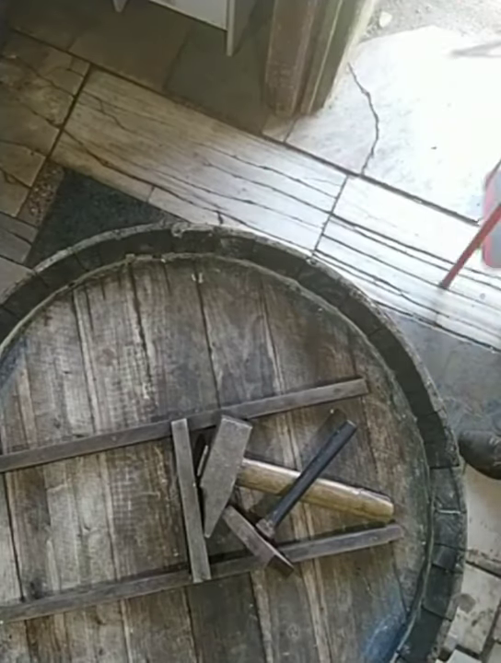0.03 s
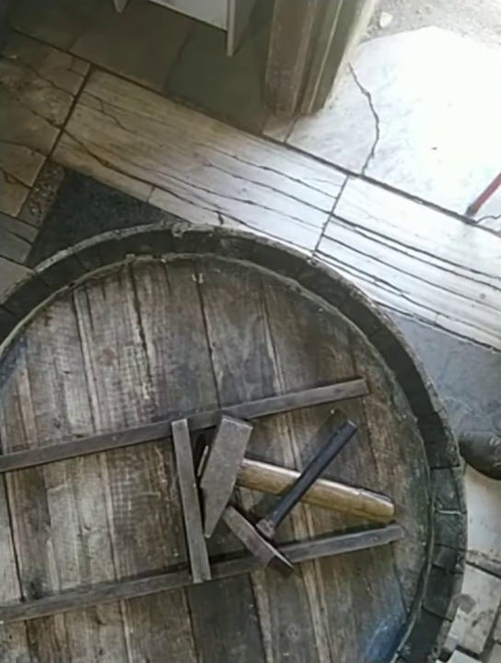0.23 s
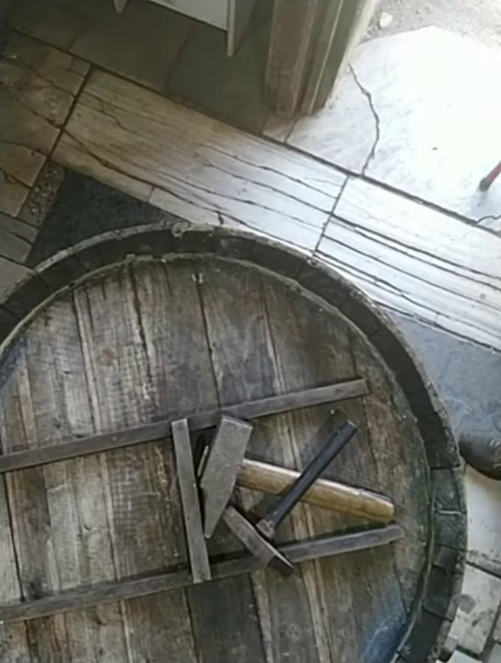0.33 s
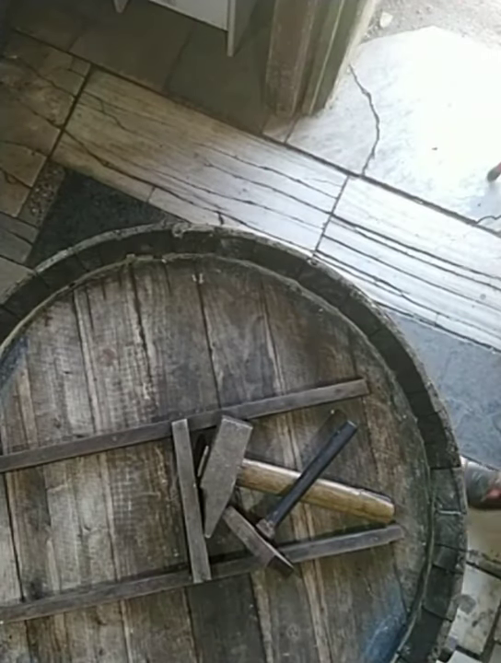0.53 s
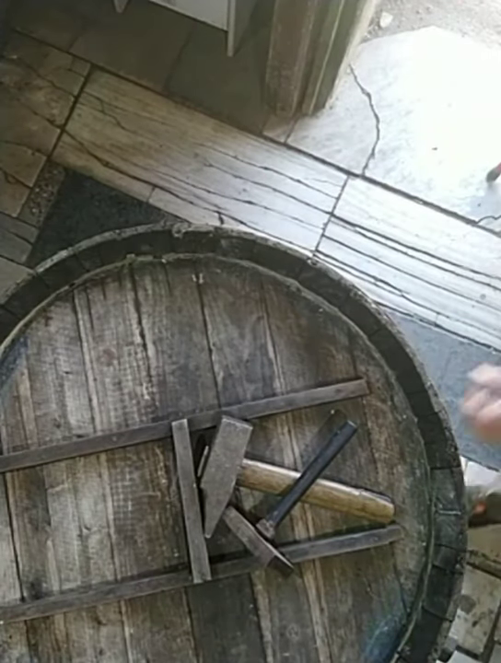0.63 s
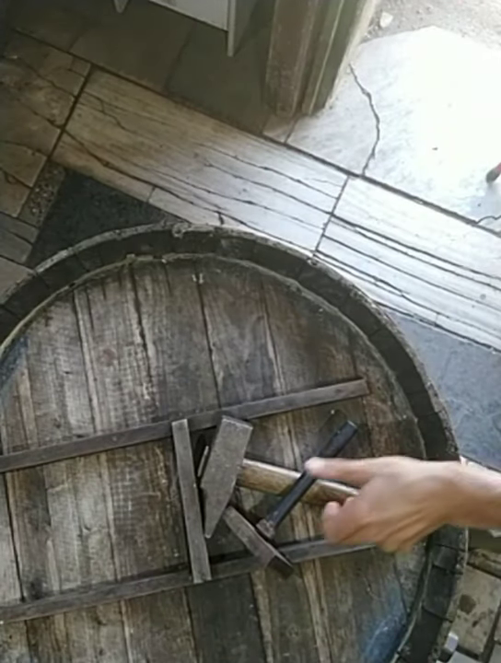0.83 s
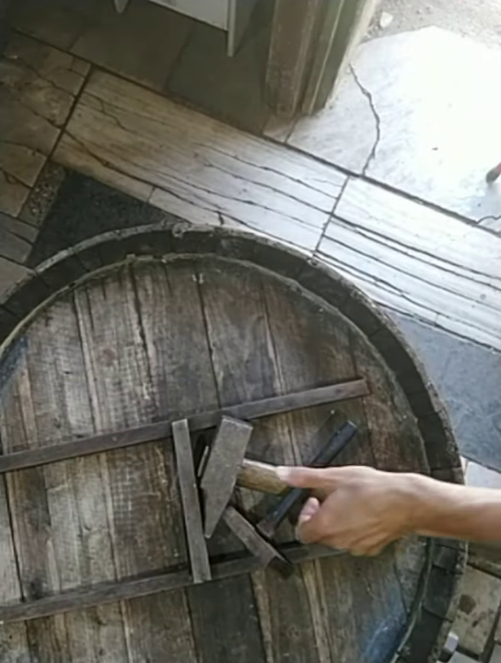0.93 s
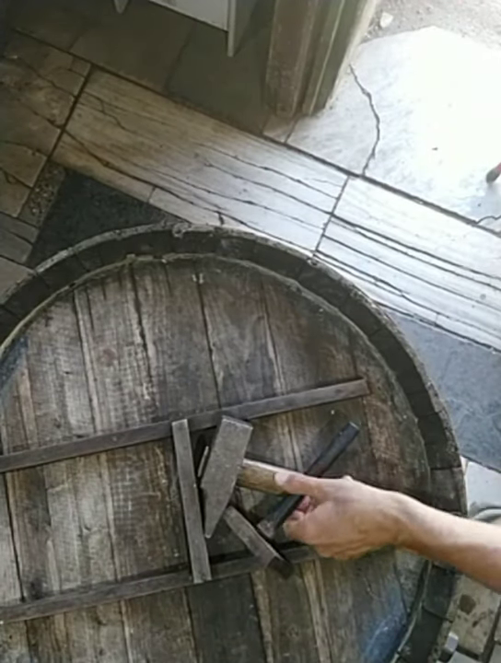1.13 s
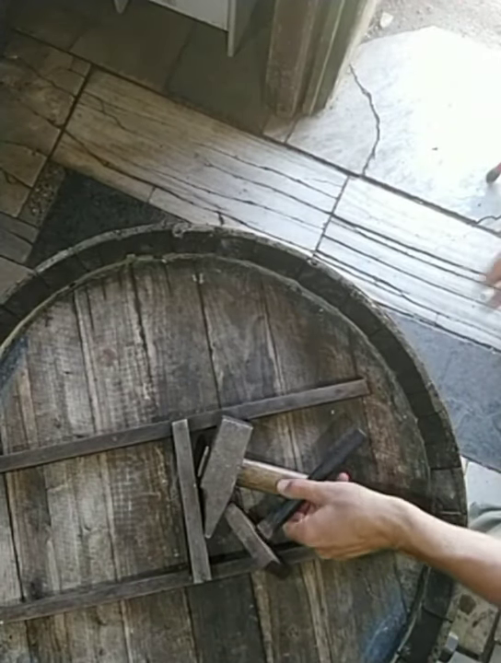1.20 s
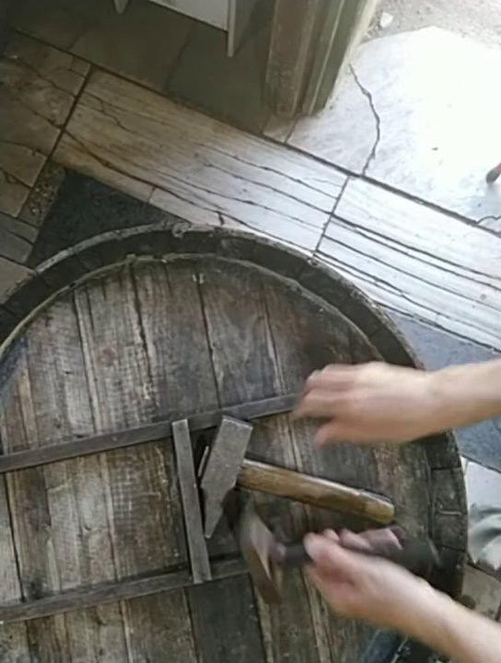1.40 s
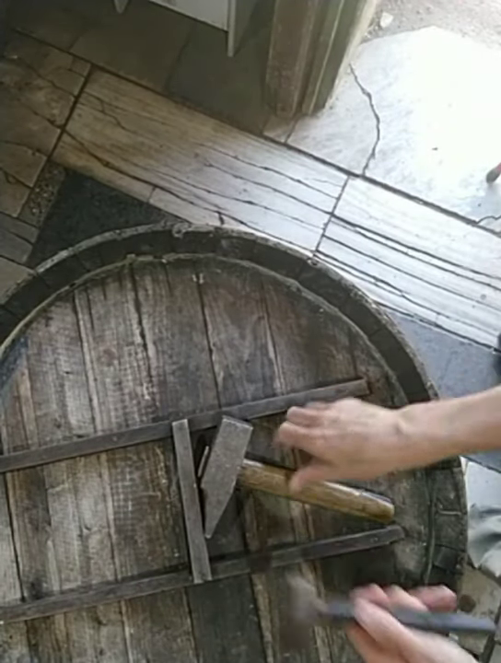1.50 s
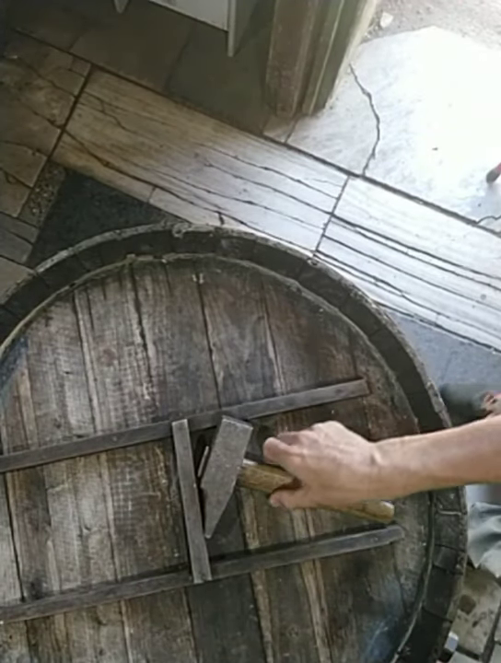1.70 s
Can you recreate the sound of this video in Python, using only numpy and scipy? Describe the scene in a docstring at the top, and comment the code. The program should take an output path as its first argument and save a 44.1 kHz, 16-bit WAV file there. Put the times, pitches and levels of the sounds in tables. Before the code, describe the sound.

Chair legs scrape and judder across stone in a doorway, the metal frame ringing. Next a hammer slides, clinks against other tools and thuds on a hollow barrel lid. Clothes rustle faintly and a distant machine hums outdoors.

```python
"""A metal-framed chair is dragged over stone paving in a doorway: stick-slip friction at its feet
grates, and with the bumps of its legs drives the ringing modes of the frame. Then a hammer is pulled
from among the tools on a wooden barrel: it slides and knocks on the hollow, resonant lid, and steel
clinks on steel. Clothes rustle faintly and a far machine hums in the outdoor air.
Reflections from near walls add a short echo, and two microphones hear the scene from above."""
import sys
import numpy as np
from scipy import signal
from scipy.fft import rfft, irfft
from scipy.io import wavfile

SR = 44100
rng = np.random.default_rng(int(sys.argv[2]) if len(sys.argv) > 2 else 0)


def transcribe(u):
    """Save the signal u as a 16-bit wav file named by the first command-line argument.

    u: samples, shape (n,) or (channels, n), limited to [-1, 1]; the rate is SR.
    q: integer samples, one column per channel.
    """
    v = np.clip(np.atleast_2d(u).T, -1, 1)
    q = np.round(v * 32767).astype(np.int16)
    wavfile.write(sys.argv[1], SR, q)


N = 77175

# partials of the machine hum (frequency [Hz], level [dB])
HUM_PARTIALS = [(70.0, -63.5), (140.0, -57), (209.9, -62), (366.1, -100), (452.2, -70.5)]
# spectrum of the outdoor air (frequency [Hz], relative level [dB])
AIR_SPECTRUM = [(20, -27.5), (55, -0.5), (100, 8.5), (170, -1.5), (280, -10), (480, -5), (900, -10),
                (1600, -16.5), (5000, -25), (15000, -22)]
# envelope of the rustle (time [s], level [dB])
RUSTLE_ENVELOPE = [(0, -65), (.14, -54), (.2, -63.5), (.92, -67), (.99, -61), (1.06, -102), (1.17, -64),
                   (1.24, -51.5), (1.36, -50.5), (1.5, -64), (1.58, -66.5), (1.7, -73)]
# spectrum of rubbing cloth (frequency [Hz], relative level [dB])
CLOTH_SPECTRUM = [(200, -7), (900, 6.5), (2300, 10.5), (3300, 5.5), (5300, 3), (8000, 1), (15000, -6)]
# envelope of the frame's low shudder (time [s], level [dB])
SHUDDER_ENVELOPE = [(.19, -68), (.22, -52), (.4, -48), (.56, -52), (.62, -39), (.7, -50), (.79, -44),
                    (.88, -69)]
# friction at the chair feet (time [s], level [dB], treble gain [dB])
DRAG_ENVELOPE = [(.194, -81, 9), (.2, -23, 2), (.216, -21, -12), (.235, -26.5, -3), (.254, -21.5, 2.5),
                 (.298, -41.5, 6), (.32, -23.5, -1.5), (.402, -41, -5), (.438, -27.5, -1), (.478, -44.5, 2),
                 (.53, -34, 4), (.572, -25, -8.5), (.602, -17.5, 5.5), (.648, -29, 2.5), (.715, -56, -13),
                 (.755, -51.5, 10.5), (.815, -42.5, -2), (.86, -76, -33)]
# bumps of the chair legs (time [s], level [dB], contact time [ms])
LEG_BUMPS = [(.2415, 12, 0.64), (.25, 15, 0.42), (.261, 16, 0.44), (.4855, 0.5, 0.11), (.512, 13, 0.4),
             (.788, 6.5, 0.57), (.797, 4.5, 0.99), (.812, 0.5, 0.8), (.822, -7, 1)]
# spectrum of a foot grating on stone (frequency [Hz], relative level [dB])
GRATE_SPECTRUM = [(30, -15.5), (70, -33), (105, -30), (150, 0), (280, -12), (420, -3), (800, -3.5),
                  (1400, -4), (2400, 0.5), (3100, -3.5), (5500, -5.5), (9000, -9.5), (15500, -11.5)]
# modes of the chair frame (frequency [Hz], relative level [dB], T60 [s])
FRAME_MODES = [(212.4, -13, 0.29), (401.6, -12, 0.26), (464.8, -16.5, .25), (499.7, -12.5, 0.23),
               (805, -18, 0.14), (969, -26.5, 0.27), (1360, -16.5, 0.067), (1461, -19.5, 0.14),
               (1837, -18.5, .16), (2155, -8.5, 0.19), (2325, -18.5, 0.27), (3620, -14, 0.075)]
# friction as a hand touches the tools, then the hammer slides (time [s], level [dB])
SLIDE_ENVELOPE = [(.94, -58), (.99, -50), (1.06, -68), (1.2, -62), (1.265, -51), (1.296, -34.5),
                  (1.34, -32.5), (1.36, -37.5), (1.378, -46.5), (1.435, -40), (1.48, -59.5)]
# knocks on the lid (time [s], level [dB], contact time [ms])
LID_KNOCKS = [(.981, -17.5, 2), (.997, -15, 1.2), (1.2695, 1.5, 2.42), (1.277, -8.5, 0.22),
              (1.309, -9, 2.1), (1.356, -3, 0.51), (1.364, -11, .7), (1.387, 14, 1.97), (1.417, -1, 2.3),
              (1.576, -8.5, 2)]
# spectrum of the wood's dull thud (frequency [Hz], relative level [dB])
THUD_SPECTRUM = [(40, -40), (130, 0), (230, 5.5), (380, 0), (700, -6.5), (1500, -10), (2500, -3.5),
                 (5000, -22.5), (15000, -36)]
# modes of the barrel lid (frequency [Hz], relative level [dB], T60 [s])
LID_MODES = [(195, -1, 0.45), (231, -10.5, .14), (281.6, -9.5, 0.61), (366, -6.5, 0.5), (551, -5, 0.14),
             (607, -10.5, 0.28), (737, -16.5, 0.19), (1000, -9.5, 0.074), (1100, -22, 0.14)]
# contacts of steel on steel (time [s], level [dB])
STEEL_CLINKS = [(1.2699, -10.5), (1.277, -16), (1.364, -18), (1.387, -10.5)]
# modes of the hammer head (frequency [Hz], relative level [dB], T60 [s])
STEEL_MODES = [(1582, -5, 0.034), (2449, -3, 0.13), (3330, -4, 0.05), (5220, -2.5, 0.041)]
# response of the left microphone (frequency [Hz], gain [dB])
LEFT_RESPONSE = [(500, 1), (2400, -5.5), (4100, -3.5), (5500, -5.5), (7000, -2), (7650, -7), (8000, -13.5),
                 (8700, -3.5), (15500, -15)]
# response of the right microphone (frequency [Hz], gain [dB])
RIGHT_RESPONSE = [(500, 0), (2400, -1), (4000, 1.5), (5400, 7), (6500, -3.5), (7300, -13), (8000, -49),
                  (8800, -13), (11700, -21.5), (15000, -12.5)]

SLIPS_PER_S, JUDDER_HZ = 1800, 129.75
ROOM_LOW_T60_S, ROOM_HIGH_T60_S, ROOM_ONSET_S, COHERENT_BELOW_HZ = 0.37, 0.24, 0.003, 706
MIC_SPACING_M, SOUND_SPEED_M_S = 0.1, 343
CHAIR_LAG_MS, LID_LAG_MS = 0.068, -0.16  # right microphone behind the left
TIME = np.arange(N) / SR


def undb(db):
    """Amplitude grows tenfold for every 20 dB."""
    return 10 ** (np.asarray(db) / 20)


def unit(x):
    """Normalisation to rms 1."""
    return x / np.sqrt(np.mean(x ** 2))


def envelope(rows, column=1):
    """Gain at every sample, by linear interpolation in decibels."""
    rows = np.array(rows)
    return undb(np.interp(TIME, rows[:, 0], rows[:, column]))


def drift(hz):
    """Slow random modulation: interpolation between Gaussian values."""
    points = rng.standard_normal(4096)
    return np.interp(TIME * hz, np.arange(len(points)), points)


def decay(t, t60):
    """Exponential damping: 60 dB are lost in t60 seconds."""
    return np.exp(-np.log(1000) * t / t60)


def through(x, response):
    """A linear system convolves its input with its impulse response."""
    return signal.fftconvolve(np.atleast_2d(x), np.atleast_2d(response), axes=-1)[:, :N]


def butter(x, kind, hz, order=2):
    """A maximally flat filter falls 6 dB per octave and order beyond its cutoff."""
    return signal.sosfilt(signal.butter(order, hz, kind, fs=SR, output="sos"), x)


def minimum_phase(spectrum, size=4096):
    """Folding the cepstrum gives a causal response with the given spectrum."""
    hz, db = np.array(spectrum).T
    bins_hz = np.maximum(np.fft.rfftfreq(size, 1 / SR), 1)
    magnitude = undb(np.interp(np.log(bins_hz), np.log(hz), db))
    cepstrum = irfft(np.log(magnitude))
    cepstrum[1:size // 2] *= 2
    cepstrum[size // 2 + 1:] = 0
    return np.pad(irfft(np.exp(rfft(cepstrum))), (0, N - size))


def body(spectrum):
    """Heavy damping gives a broad, brief response, here of energy 1."""
    return unit(minimum_phase(spectrum)) / np.sqrt(N)


def machine_hum():
    """A far machine's partials waver by slight amplitude and phase modulation."""
    return sum(np.sqrt(2) * undb(db + 2 * drift(6)) * np.sin(2 * np.pi * hz * TIME + 0.56 * drift(4.8))
               for hz, db in HUM_PARTIALS)


def diffuse_noise():
    """In a diffuse field, long waves are coherent at two nearby points."""
    mid, side = rfft(rng.standard_normal((2, N)))
    coherence = 1 / (1 + (np.fft.rfftfreq(N, 1 / SR) / COHERENT_BELOW_HZ) ** 2)
    pair = mid * np.sqrt(1 + coherence) + np.array([[1], [-1]]) * side * np.sqrt(1 - coherence)
    return irfft(pair, N) / np.sqrt(2)


def outdoor_air(level_db=-52):
    """Ambient noise is a diffuse field; its level drifts by about a decibel."""
    return through(diffuse_noise(), body(AIR_SPECTRUM)) * undb(level_db - drift(1.9))


def slips(per_s, scatter_db=4.5, judder_db=4.5):
    """Stick-slip friction: tiny random jerks whose strength swells and sinks."""
    jerks = (rng.random(N) < per_s / SR) * rng.choice([-1, 1], N)
    size_db = scatter_db * np.clip(rng.standard_normal(N), -2, 2) + judder_db * drift(JUDDER_HZ)
    return unit(jerks * undb(size_db))


def doorway(x, room_db, lag_ms):
    """Wall reflections follow the direct sound as reverberation whose treble dies first."""
    noise = diffuse_noise()
    low = butter(noise, "low", 900) * decay(TIME, ROOM_LOW_T60_S)
    high = butter(noise, "high", 1160) * decay(TIME, ROOM_HIGH_T60_S)
    onset = np.clip(TIME / ROOM_ONSET_S - .5, 0, 1)
    tail = unit((low - high) * onset) / np.sqrt(N)
    delay_samples = 16 + np.array([[-.5], [.5]]) * lag_ms * SR / 1000
    direct = np.sinc(np.arange(N) - delay_samples) * (np.arange(N) < 33)
    return through(x, direct + undb(room_db) * tail) / np.hypot(1, undb(room_db))


def rustle():
    """Friction of clothes and skin makes a soft broadband noise."""
    rubbing = slips(4000) * envelope(RUSTLE_ENVELOPE)
    return doorway(through(rubbing, body(CLOTH_SPECTRUM)), room_db=5.5, lag_ms=0)


def shudder(hz=60.3, bandwidth_hz=4.7):
    """A randomly driven resonance: the sliding chair flexes on its legs."""
    resonator = signal.iirpeak(hz, hz / bandwidth_hz, fs=SR)
    flex = signal.lfilter(*resonator, rng.standard_normal(N))
    return unit(butter(flex, "low", 2 * hz)) * envelope(SHUDDER_ENVELOPE)


def ring(modes):
    """Free vibration is a sum of damped modes; each reaches the microphones from its own direction."""
    response = 0
    for hz, db, t60 in modes:
        lag_s = rng.uniform(-1, 1) * MIC_SPACING_M / SOUND_SPEED_M_S
        t = np.maximum(TIME - np.maximum([[lag_s], [-lag_s]], 0), 0)
        response = response + undb(db) * unit(np.sin(2 * np.pi * hz * t) * decay(t, t60))
    return response / np.sqrt(N)


def chair(feet=4, ring_db=-3.5):
    """Superposition: each foot grates along its own sound path, and all drive the one frame."""
    forces = [foot_force() / np.sqrt(feet) for _ in range(feet)]
    grating = sum(doorway(through(force, body(GRATE_SPECTRUM)), room_db=2, lag_ms=CHAIR_LAG_MS)
                  for force in forces)
    return grating + undb(ring_db) * through(sum(forces), ring(FRAME_MODES))


def foot_force(treble_hz=2370, crunch_db=-1):
    """Friction and impact: a foot sticks and slips on stone and crushes grit at each bump."""
    friction = slips(SLIPS_PER_S) * envelope(DRAG_ENVELOPE)
    treble_change = (envelope(DRAG_ENVELOPE, column=2) - 1) * butter(friction, "high", treble_hz, order=1)
    crunch = through(impacts(LEG_BUMPS), grit(decay_s=0.0046))
    crunch = butter(crunch, "high", 600, order=1)  # the light legs give little bass
    return friction + treble_change + undb(crunch_db) * crunch


def contact_pulse(ms):
    """Force pulse of unit impulse: the longer the contact, the duller the sound."""
    scaled_time = 5 * np.arange(1, 1024) / SR * 1000 / ms
    force = scaled_time ** 2 * np.exp(-scaled_time)
    return force / force.sum()


def impacts(rows):
    """The force pulses of separate contacts add linearly."""
    return sum(undb(db) * through(signal.unit_impulse(N, int(s * SR)), contact_pulse(ms))
               for s, db, ms in rows)


def grit(decay_s):
    """A crunch is an impulse and a dying burst of slips, of total energy 1."""
    burst = slips(SLIPS_PER_S) * np.exp(-TIME / decay_s)
    return unit(burst + 4 * signal.unit_impulse(N)) / np.sqrt(N)


def hammer():
    """One sliding friction excites both bodies, the wooden lid and the steel head."""
    sliding = slips(1600, scatter_db=0, judder_db=2) * envelope(SLIDE_ENVELOPE)
    return barrel_lid(sliding) + hammer_head(sliding)


def barrel_lid(sliding, thud_db=1.5, ring_db=-4):
    """Forced vibration: knocks and friction make the hollow lid thud and ring in its modes."""
    force = impacts(LID_KNOCKS) + through(sliding, contact_pulse(ms=0.46))
    force = butter(force, "high", 126)  # the lid hardly radiates below this
    thud = doorway(through(force, undb(thud_db) * body(THUD_SPECTRUM)), room_db=-4, lag_ms=LID_LAG_MS)
    return thud + undb(ring_db) * through(force, ring(LID_MODES))


def hammer_head(sliding, contact_ms=0.27, tick_db=13, scrape_db=-27):
    """Brief contacts excite high modes: the rusty head clinks and scrapes against the other tools."""
    touches = impacts([(s, db, contact_ms) for s, db in STEEL_CLINKS])
    clinks = through(touches, ring(STEEL_MODES))
    rust_ticks = undb(tick_db) * through(touches, grit(decay_s=0.0099))
    scrape = undb(scrape_db) * through(sliding, contact_pulse(contact_ms))
    return doorway(clinks + rust_ticks + scrape, room_db=-6.5, lag_ms=LID_LAG_MS)


def scene():
    """Superposition: the pressures of chair, hammer and surroundings add."""
    return chair() + shudder() + hammer() + rustle() + machine_hum() + outdoor_air()


def record(dry, low_cut_hz=28, high_cut_hz=15900):
    """Each microphone is a band-limited linear filter with its own frequency response."""
    heard = through(dry, np.array([minimum_phase(LEFT_RESPONSE), minimum_phase(RIGHT_RESPONSE)]))
    heard = butter(heard, "high", low_cut_hz)
    return signal.sosfilt(signal.ellip(10, .2, 80, high_cut_hz, fs=SR, output="sos"), heard)


dry = scene()
out = record(dry)
transcribe(out)
```